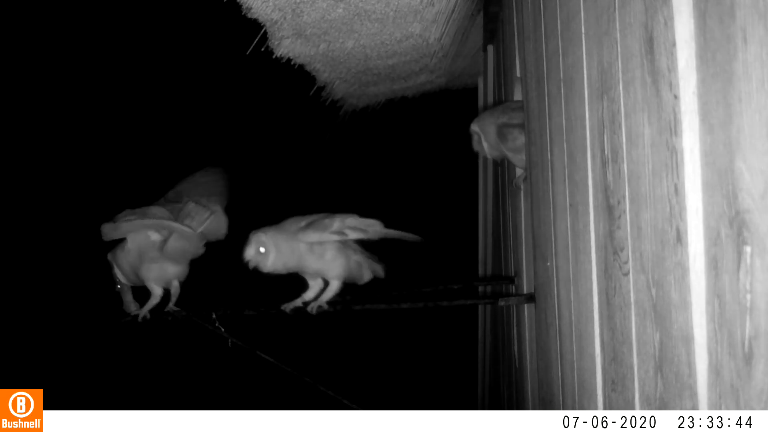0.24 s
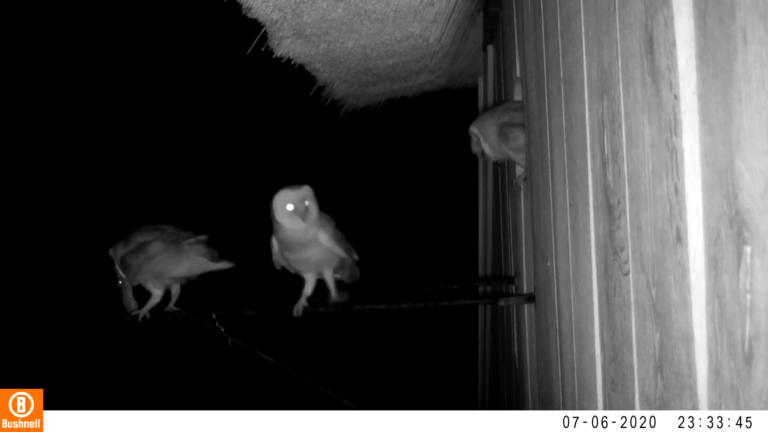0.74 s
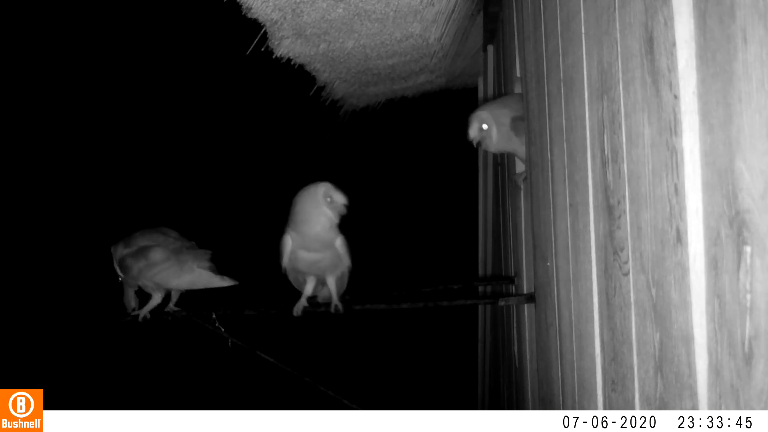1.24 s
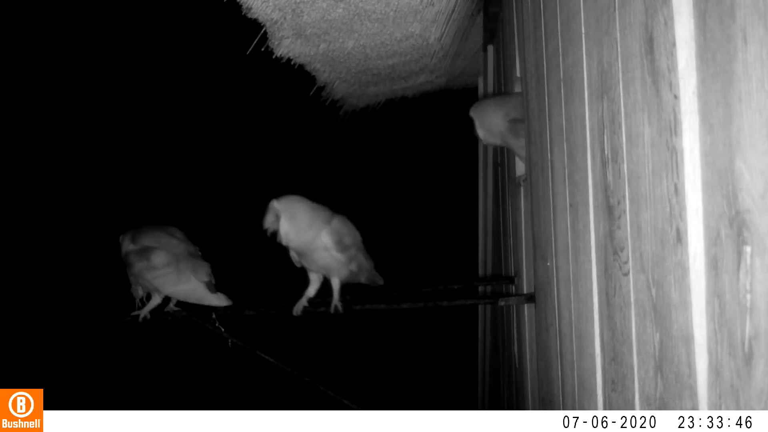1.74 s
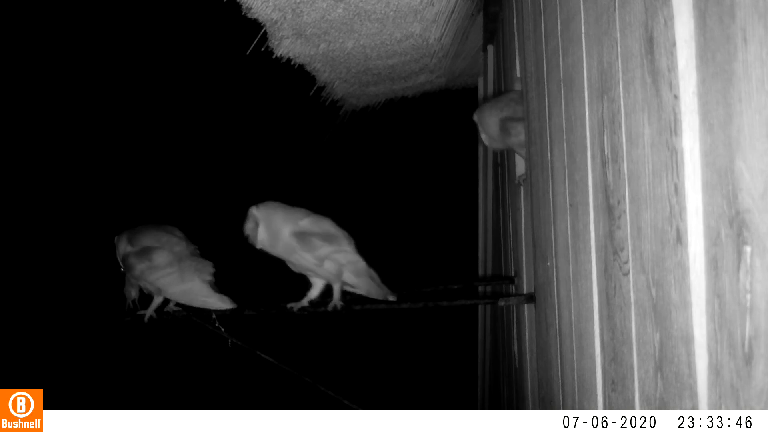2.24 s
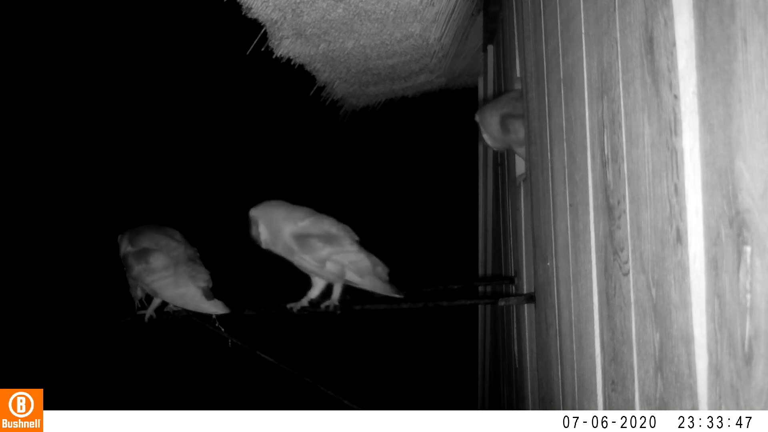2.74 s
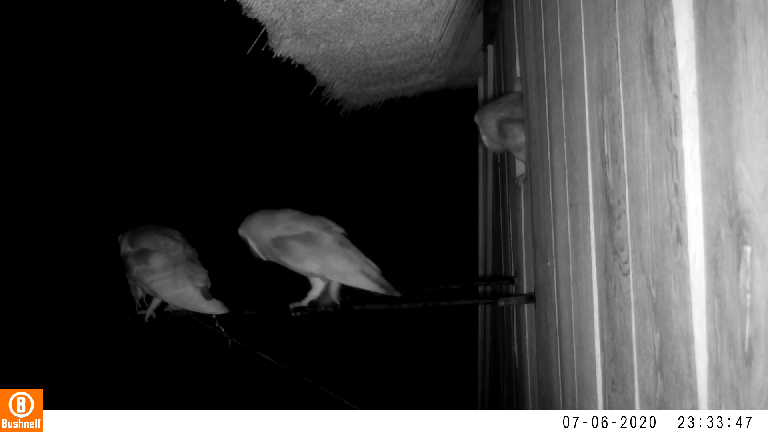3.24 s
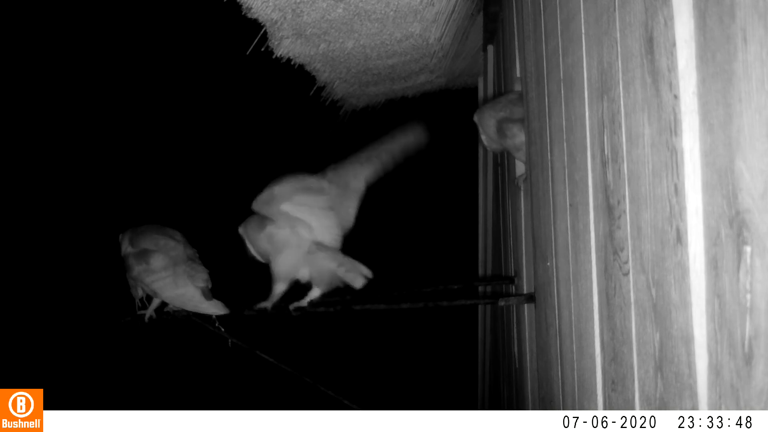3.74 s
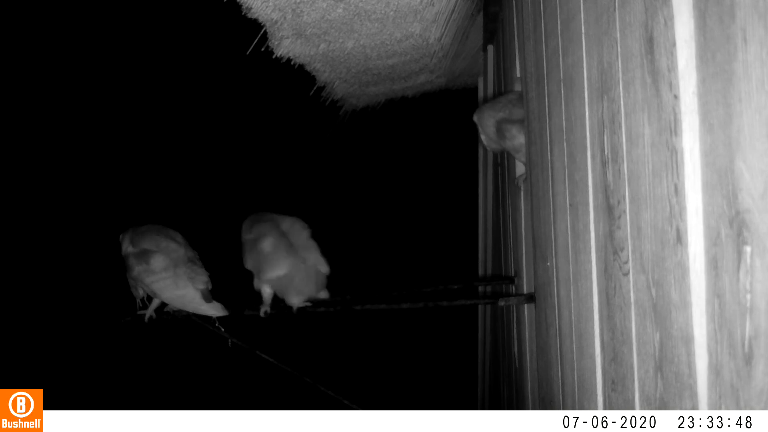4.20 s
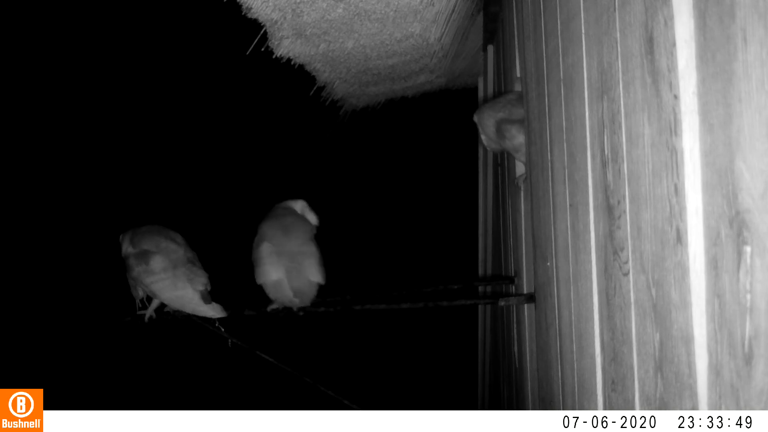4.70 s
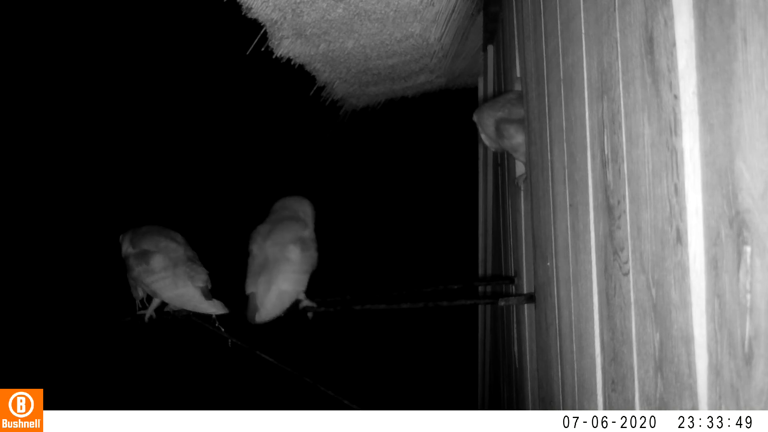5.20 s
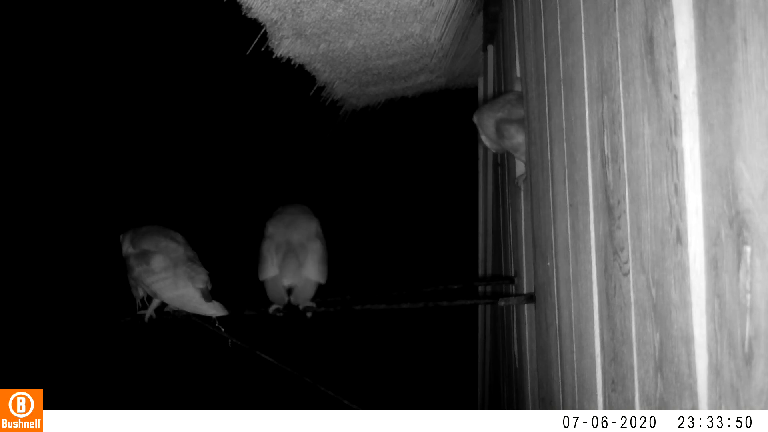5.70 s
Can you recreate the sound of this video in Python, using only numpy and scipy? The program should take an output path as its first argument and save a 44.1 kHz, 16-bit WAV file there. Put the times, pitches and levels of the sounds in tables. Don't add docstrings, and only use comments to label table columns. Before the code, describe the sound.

Night, beside a wooden nest box, heard through a small hissy camera microphone. The muffled tail of an earlier call dies at 0-0.13 s, leaving dull air and faint low rumble. At 0.43 s a small click and quick rising thin whistle open a near owlet's harsh, fluttering hiss, swelling to its loudest around 1.0-1.37 s, with tiny overload ticks and a breathy falling end. Another owlet answers from 1.33 to 2.2 s, swelling slowly, with a short call from the box underneath. A brighter click at 2.25 s starts the near bird's second long rasp, ending about 3.2 s with a muffled echo. After a brief lull, a short hoarse call comes at 3.4-3.9 s, then two quiet overlapping calls until 4.7 s. The near bird clicks, whistles and rasps again from 4.84 to 5.86 s; another call begins at 5.75 s and runs past the end. Soft wood knocks are scattered faintly throughout.

```python
import sys
import numpy as np
from scipy import signal
from scipy.fft import rfft, irfft
from scipy.io import wavfile
from scipy.ndimage import uniform_filter1d, minimum_filter1d

SR = 44100
rng = np.random.default_rng(int(sys.argv[2]) if len(sys.argv) > 2 else 0)


def bounce(signal):
    frames = np.transpose(np.atleast_2d(signal))
    limited = np.clip(frames, -1, 1)
    pcm = np.round(limited * 32767).astype(np.int16)
    wavfile.write(sys.argv[1], SR, pcm)


def magnitude_from_level(level_db):
    exponent = np.asarray(level_db, float) / 20
    return 10 ** exponent


N = 262395


def evened(x):
    return x / np.sqrt(np.mean(x ** 2) + 1e-20)


def add(mix, start_s, sound):
    part = mix[round(start_s * SR):][:len(sound)]
    part += sound[:len(part)]


def noise(length):
    return rng.standard_normal(length)


def wander(length, hz):
    smooth = uniform_filter1d(noise(length), size=64)
    return evened(signal.lfilter([1], [1, -np.exp(-2 * np.pi * hz / SR)], smooth))


def resonate(x, hz, width_hz):
    turn = np.exp(2j * np.pi * np.cumsum(hz * np.ones(len(x))) / SR)
    r = np.exp(-np.pi * 2 * width_hz / SR)
    z = x / turn
    for _ in range(3):
        z = signal.lfilter([1 - r], [1, -r], z)
    return evened((turn * z).real)


def colour(x, points):
    points_hz, db = np.transpose(points)
    hz = np.fft.rfftfreq(N, 1 / SR)
    gain_db = np.interp(np.log(hz + 1), np.log(points_hz + 1), db)
    return irfft(rfft(x) * magnitude_from_level(gain_db), N)


def fuzz(rows, flicker_db, swell_db=0, fade_db=0, climb_hz_per_s=0, soft=.25):
    out = np.zeros(N)
    for start_s, length_s, hz, width_hz, db in rows:
        t = np.arange(0, length_s, 1 / SR)
        u = t / length_s
        level_db = db - swell_db * (1 - u) - fade_db * u + flicker_db * wander(len(t), 40)
        edge = signal.windows.tukey(len(t), soft)
        add(out, start_s, magnitude_from_level(level_db) * edge * resonate(noise(len(t)), hz + climb_hz_per_s * t, width_hz))
    return out


def sink(order):
    # deepest_s, until_s, air_sink_db, hiss_sink_db
    pauses = [
        (0.044, 0.434, 9.5, 10.5),
        (3.31, 3.402, 7.5, 2),
        (4.767, 4.832, 8, 3.5),
    ]
    sink_s, return_s = 0.16, 0.048
    t = np.arange(N) / SR
    total_db = np.zeros(N)
    for a, b, *db in pauses:
        total_db += np.interp(t, [a - sink_s, a, b, b + return_s], [0, db[order], db[order], 0])
    return total_db


def converter():
    # start_s, length_s, centre_hz, width_hz, level_db
    whine_rows = [
        (1.37, .09, 11440, 900, -77),
        (3.2, 0.31, 12240, 3200, -75.5),
        (4.62, .28, 12100, 3200, -74.5),
    ]
    idle_rows = [
        (0.0028, .46, 15600, 2400, -75),
    ]
    hiss = noise(N) * magnitude_from_level(-74 - sink(order=1))
    whine = fuzz(whine_rows, 1.5, climb_hz_per_s=-5000, soft=.9)
    return hiss + whine + fuzz(idle_rows, 2.5, swell_db=3)


def overload():
    # start_s, peak_db
    ticks = [(.920, -59), (.945, -62), (1.092, -62), (1.145, -59), (1.185, -58), (1.197, -55), (1.206, -63),
             (1.215, -52), (1.218, -50), (1.243, -51), (1.247, -59), (1.257, -53), (1.2695, -50),
             (1.300, -63)]
    out = np.zeros(N)
    shape = np.hanning(70)
    for start_s, db in ticks:
        grain = noise(len(shape))
        third = resonate(grain, 11500, 2600) + .3 * grain
        add(out, start_s - .001, magnitude_from_level(db + 1.5) * shape * (third + 2.9))
    return out


def air(birds):
    # hz, level_db per Hz
    air_colour = [(100, -25), (250, -12.5), (600, -2), (1200, -0.5), (2300, -3), (3800, -11), (5000, -24),
                  (7000, -43)]
    # hz, level_db per Hz
    rumble_colour = [(12, -46), (20, -25), (53, -3.5), (81, -20), (108, -5.5), (329, -4), (500, -7),
                     (650, -38.5), (1100, -120)]
    loud_db = 10 * np.log10(abs(uniform_filter1d(birds ** 2, size=4000)) + 1e-9)
    duck_db = 0.28 * np.maximum(loud_db + 33.5, 0)
    wash = evened(colour(noise(N), air_colour))
    rumble = evened(colour(noise(N), rumble_colour))
    return magnitude_from_level(-48.5 - sink(order=0) - duck_db) * wash + magnitude_from_level(-67) * rumble


def bumps():
    # start_s, peak_db, hz, length_s
    pushes = [
        (0.526, -57, 240, 0.063),
        (.91, -67, 130, 0.025),
        (1.14, -54, 200, 0.019),
        (1.18, -58, 60, .1),
        (1.959, -58.5, 220, .08),
        (3.461, -57.5, 253, .14),
        (4.751, -56, 205, 0.083),
    ]
    out = np.zeros(N)
    for start_s, db, hz, length_s in pushes:
        shape = signal.windows.tukey(round(length_s * SR), .6)
        add(out, start_s, magnitude_from_level(db - 5) * shape * resonate(noise(len(shape)), hz, .45 * hz))
    return out


def barn_echoes():
    # start_s, length_s, centre_hz, width_hz, level_db
    muffled = [
        (0, .13, 3470, 960, -49),
        (0, .07, 2680, 500, -48),
        (3.2, 0.24, 3800, 900, -49.5),
        (4.64, 0.18, 3560, 1600, -57),
    ]
    return fuzz(muffled, .84, fade_db=22, soft=.03)


def box_wall(x):
    t = np.arange(SR // 3) / SR
    taps = rng.choice([-1., 0, 0, 0, 0, 0, 0, 1.], len(t)) * magnitude_from_level(-60 * t / .3) * (t > .006)
    return signal.fftconvolve(x, taps / np.linalg.norm(taps))[:N]


def rasp():
    # start_s, length_s, centre_hz, width_hz, level_db
    bands = [
        (.9, .49, 9300, 2400, -71.5),
        (3.58, .32, 8950, 1200, -86),
        (0.59, .83, 6950, 500, -70.5),
    ]
    # start_s, length_s, first_hz, width_hz, level_db
    strands = [
        (1.42, .58, 7900, 350, -85),
        (1.6, .6, 7800, 350, -83.5),
        (1.45, .25, 9100, 350, -83.5),
        (1.9, .3, 7900, 350, -81),
    ]
    return fuzz(bands, .84, swell_db=9.5) + fuzz(strands, 2.5, climb_hz_per_s=2900)


def clicks():
    # start_s, peak_db, ring_hz
    pops = [
        (.428, -43, 1050),
        (2.247, -35, 2700),
        (4.842, -43.5, 1000),
    ]
    out = np.zeros(N)
    t = np.arange(400) / SR
    u = t / 0.0019
    for start_s, db, hz in pops:
        ring = np.sin(2 * np.pi * hz * t) + 0.6 * resonate(noise(len(t)), 2600, 1200)
        add(out, start_s - .002, magnitude_from_level(db) * ring * u * np.exp(1 - u))
    return out


def whistles():
    # start_s, length_s, top_hz, level_db
    openers = [
        (0.425, .041, 2640, -54),
        (4.842, 0.025, 2410, -53.5),
    ]
    from_hz, rise_s, swell_db = 1050, .008, 5
    out = np.zeros(N)
    for start_s, length_s, top_hz, db in openers:
        t = np.arange(0, length_s, 1 / SR)
        hz = top_hz + (from_hz - top_hz) * np.exp(-t / rise_s)
        phase = 2 * np.pi * np.cumsum(hz) / SR
        overtone = magnitude_from_level(-5) * np.clip((2300 - hz) / 300, 0, 1) * np.sin(2 * phase)
        swell = magnitude_from_level(db - 2.5 + swell_db * (t / length_s + 1.5))
        add(out, start_s, swell * (np.sin(phase) + overtone) * signal.windows.tukey(len(t), .3))
    return out


def breath_drops():
    # start_s, length_s, first_hz, level_db
    closers = [
        (1.363, .03, 2300, -33),
        (3.185, 0.031, 1800, -35.5),
        (5.836, .032, 2530, -36),
    ]
    to_hz, width_hz, fade_db = 1100, 370, 11
    out = np.zeros(N)
    for start_s, length_s, first_hz, db in closers:
        u = np.arange(0, length_s, 1 / SR) / length_s
        drop = resonate(noise(len(u)), first_hz + (to_hz - first_hz) * u, width_hz)
        add(out, start_s, magnitude_from_level(db - fade_db * u) * drop * signal.windows.tukey(len(u), .3))
    return out


def call(rows, habit, pipe, side, cut_hz):
    first_hz, last_hz, beak_db, ridge_db = habit
    upper_width_hz, lower_width_hz, beak_hz, beak_width_hz = pipe
    s, *columns = np.transpose(rows)
    t = np.arange(s[0], s[-1], 1 / SR)
    n = len(t)
    effort_db, upper_hz, lower_db = (np.interp(t, s, c) for c in columns)
    upper_hz = upper_hz * (1 + .006 * wander(n, 25))
    lower_hz = np.linspace(first_hz, last_hz, n) * (1 + .006 * wander(n, 25))
    drive = noise(n) * magnitude_from_level(.3 * wander(n, 90))
    ridge_db = ridge_db - np.linspace(12, 0, n)
    upper = resonate(drive, upper_hz, upper_width_hz)
    upper += magnitude_from_level(ridge_db) * resonate(drive, upper_hz * 1.02, 170)
    lower = resonate(drive, lower_hz, lower_width_hz)
    lower += magnitude_from_level(ridge_db - 6) * resonate(drive, lower_hz * 0.979, 200)
    voice = evened(upper) + magnitude_from_level(lower_db + 3) * evened(lower)
    voice -= magnitude_from_level(beak_db - 4) * resonate(drive, beak_hz, beak_width_hz)
    voice = signal.sosfilt(signal.butter(8, cut_hz, "high", fs=SR, output="sos"), voice)
    for hz, width_hz, db in side:
        voice += magnitude_from_level(db) * resonate(noise(n), hz, width_hz)
    release = 700 if s[0] * SR + n < N - 50 else 1
    i = np.arange(n)
    edge = np.clip(np.minimum(i / 150, i[::-1] / release), 0, 1)
    return magnitude_from_level(effort_db - 0.52) * voice * edge


def owls():
    # start_s, effort_db, upper_hz, lower_db
    near = [
        [(.455, -42, 3620, 2), (.468, -38, 3670, -3), (.62, -28.5, 3750, -5), (.88, -24, 3790, -6.5),
         (1.0, -22, 3830, -4), (1.365, -21, 3780, -5.5), (1.395, -38.5, 3600, -7)],
        [(2.243, -53.5, 3700, 8), (2.275, -35, 3760, -3.5), (2.4, -29.5, 3780, -4), (2.7, -25.5, 3950, -5.5),
         (3.19, -26.5, 3876, -5), (3.225, -41, 3700, -18)],
        [(4.862, -51.5, 3780, 5.5), (4.9, -38, 3840, -4), (5.07, -30.5, 3880, -4), (5.33, -26, 3907, -7),
         (5.825, -27, 3970, -3), (5.86, -39, 3720, -14)],
    ]
    far = [
        [(1.33, -44, 3720, -11), (1.42, -37, 3770, -21), (1.6, -31, 3840, -18), (1.87, -26.5, 3830, -12),
         (2.15, -28, 3860, -9), (2.19, -35.5, 3630, -5), (2.22, -50.5, 3780, -9)],
    ]
    flapping = [
        [(3.398, -57, 3800, 1), (3.43, -48, 3620, -3), (3.53, -37, 3570, -9), (3.68, -33, 3680, -12.5),
         (3.8, -32.5, 3500, -11), (3.86, -35, 3600, -9.5), (3.93, -41.5, 3970, -8)],
    ]
    perched = [
        [(3.87, -53, 3300, 6), (3.94, -44, 3220, 0.5), (4.12, -40.5, 3600, 3.5), (4.33, -38, 3570, -3.5),
         (4.375, -42, 3650, -5)],
    ]
    boxed = [
        [(1.34, -41, 4010, -2), (1.47, -31, 4030, -18.5), (1.56, -41.5, 4030, -11), (1.68, -50, 4000, -4)],
        [(3.86, -45, 3950, -14), (3.96, -37, 4010, -19), (4.33, -39, 4040, -10), (4.63, -40.5, 3920, -7.5),
         (4.685, -57, 3720, -2)],
        [(5.75, -32, 3970, -14), (5.86, -36.5, 3910, -24), (5.95, -37.5, 4090, -18)],
    ]
    # first_lower_hz, last_lower_hz, beak_db, ridge_db
    near_habit, far_habit = (2520, 2507.5, -23.5, -4), (2860, 2970, -4.5, -2)
    flapping_habit, perched_habit = (2950, 3000, -6, -16), (2680, 2930, -5, -6)
    boxed_habit = (2400, 2260, -13, -10)
    # upper_width_hz, lower_width_hz, beak_hz, beak_width_hz
    near_pipe, far_pipe = (430, 560, 4700, 380), (435, 287, 4632, 520)
    flapping_pipe, boxed_pipe = (710, 430, 4630, 580), (450, 403, 4600, 400)
    # hz, width_hz, level_db
    near_side = [(1550, 800, -19), (3450, 360, -6), (5750, 600, -35), (6400, 400, -40), (7200, 900, -52)]
    far_side = [(1600, 1200, -22.5), (3400, 480, -5.5), (5800, 610, -35)]
    boxed_side = [(1500, 1200, -14), (3200, 830, -3), (5700, 650, -29.5)]
    cuts_hz = [1370, 2600, 2470, 2470, 2090]
    birds = ((near, near_habit, near_pipe, near_side),
             (far, far_habit, far_pipe, far_side),
             (flapping, flapping_habit, flapping_pipe, far_side),
             (perched, perched_habit, far_pipe, far_side),
             (boxed, boxed_habit, boxed_pipe, boxed_side))
    out = clicks() + whistles() + breath_drops()
    for (calls, habit, pipe, side), cut_hz in zip(birds, cuts_hz):
        for rows in calls:
            add(out, rows[0][0], call(rows, habit, pipe, side, cut_hz))
    return out


def scene():
    # hz, level_db
    case = [(100, -29.5), (500, -10.5), (1200, 2), (2900, -1.5), (3100, -3), (3320, -1), (4250, -0.5),
            (4450, -2), (4700, -3), (9000, -4)]
    birds = owls()
    voices = colour(birds + magnitude_from_level(-12) * box_wall(birds), case)
    return (voices + rasp() + barn_echoes() + bumps() + air(birds))[None]


def band_limit(x):
    return signal.sosfilt(signal.butter(12, 15720, fs=SR, output="sos"), x)


def record(dry):
    room = minimum_filter1d(np.minimum(.3 / (abs(dry) + 1e-9), 1), size=90)
    held = dry * uniform_filter1d(room, size=90)
    bent = held + .006 * (held ** 2 - uniform_filter1d(held ** 2, size=60))
    return band_limit(bent + converter() + overload())


dry = scene()
out = record(dry)
bounce(out)
```